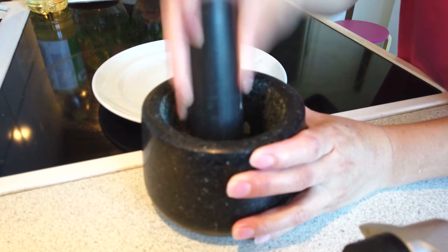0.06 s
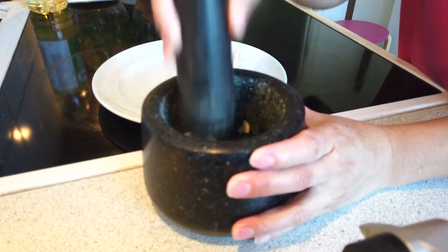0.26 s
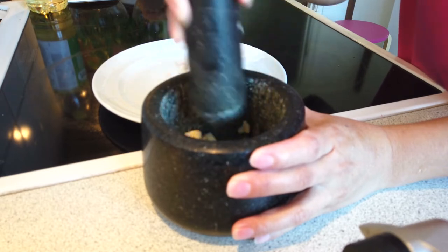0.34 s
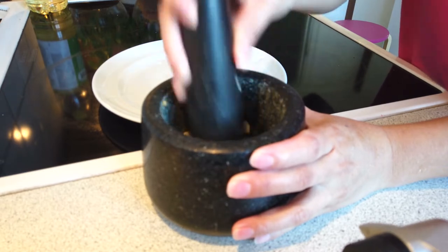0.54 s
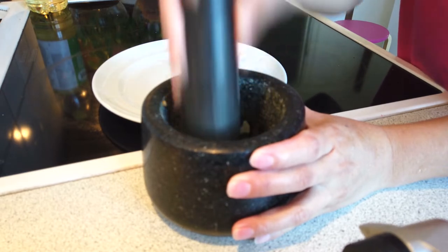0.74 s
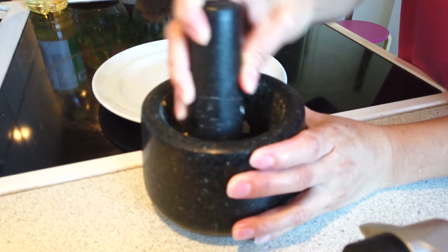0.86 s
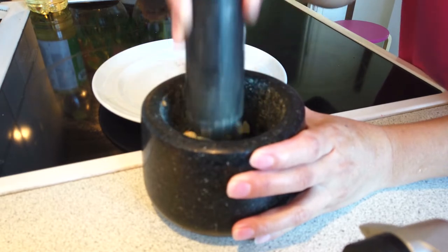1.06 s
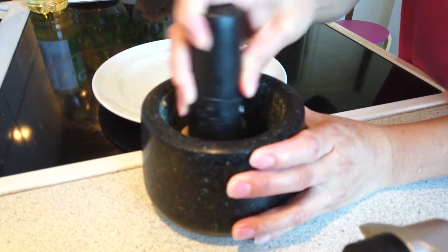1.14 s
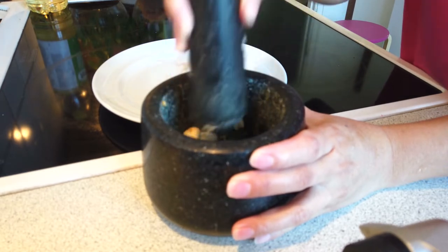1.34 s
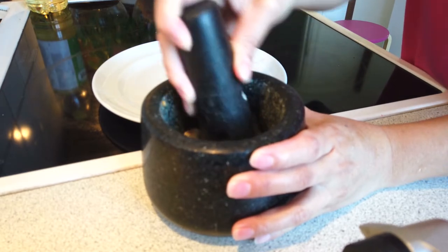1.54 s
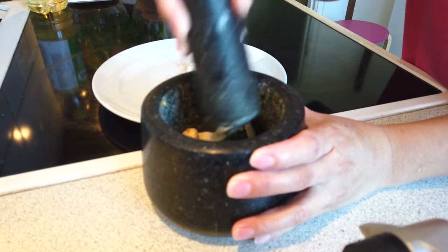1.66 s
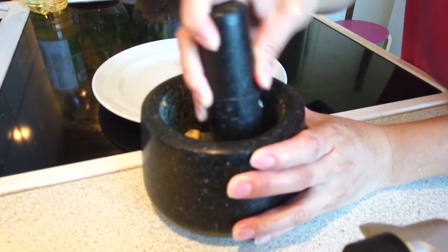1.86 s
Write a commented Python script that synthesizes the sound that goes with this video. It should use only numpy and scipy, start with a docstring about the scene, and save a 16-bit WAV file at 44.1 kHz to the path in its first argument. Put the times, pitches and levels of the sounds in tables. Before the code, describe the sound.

Granite mortar and pestle knocking and crunching on a kitchen counter, one blow far loudest

```python
"""Pestle and mortar in a kitchen

A granite pestle pounds food in a granite mortar on a counter, about three blows a second.
Cushioned blows break the food in noise bursts and bend the counter's modes; blows that reach
the stone excite the decaying modes of mortar and pestle. Near the end comes a faint short noise
burst with a few high ringing lines. A tiled kitchen answers as decaying diffuse noise over a
low rumble, and a close pair of microphones overloads on the hardest blow."""
import sys
import numpy as np
from scipy import signal
from scipy.fft import rfft, irfft
from scipy.io import wavfile
from scipy.ndimage import map_coordinates

SR = 44100
rng = np.random.default_rng(int(sys.argv[2]) if len(sys.argv) > 2 else 0)


def wrap_up_sound(samples):
    """Save the sound to the file named by the first command line argument, as 16-bit audio."""
    columns = np.atleast_2d(samples).T
    # keep every value between -1 and 1, then stretch to whole-number steps
    tamed = np.clip(columns, -1, 1)
    steps = np.round(tamed * 32767).astype(np.int16)
    wavfile.write(sys.argv[1], SR, steps)


N = 83790

# blows that reach the stone: (time [s], mortar knock level [dB], pestle ring level [dB], tick level [dB])
STONE_BLOWS = [(-0.1, -14.5, -28, -24.5), (0.2428, 9, -7.5, -16.5), (0.5800, -49, -32.5, -27.5),
               (0.938, -13, -12, -12), (1.2877, -32, -34.5, -27.5), (1.6037, -38, -31, -25.5)]


def undb(db):
    """Level as the logarithm of amplitude: decibels to gain."""
    return 10 ** (np.asarray(db) / 20)


def unit(x):
    """Energy normalization: scale to the energy of one millisecond at full level."""
    energy = SR * 0.001
    return x * np.sqrt(energy / np.sum(x ** 2))


def ring(modes):
    """Modal superposition: half a second of decaying sines, neighbours in opposite phase."""
    t = np.arange(SR // 2) / SR
    total = 0
    for k, (hz, db, t60) in enumerate(modes):
        decay = np.exp(-np.log(1000) * t / t60)
        mode = unit(np.sin(2 * np.pi * hz * t) * decay)
        total = total + (-1) ** k * undb(db) * mode  # each level weights the mode's energy
    return unit(total)


def colour(points, size):
    """Spectral envelope: gain at each FFT bin, interpolated over log frequency."""
    hz, db = np.array(points).T
    bins_hz = np.fft.rfftfreq(size, 1 / SR)
    return undb(np.interp(np.log(bins_hz + 1), np.log(hz), db))


def click(points):
    """Minimum phase: folding the cepstrum gives a causal impulse of the given colour."""
    size = SR // 2
    cepstrum = irfft(np.log(colour(points, size)), size)
    cepstrum[1:size // 2] *= 2
    cepstrum[size // 2 + 1:] = 0
    return unit(irfft(np.exp(rfft(cepstrum)), size))


def add(track, at_s, sound):
    """Linear superposition: mix a sound into a track that begins one second early."""
    start = int((at_s + 1) * SR)
    part = sound[:len(track) - start]
    track[start:start + len(part)] += part


def diffuse(size):
    """Diffuse-field coherence: noise spectra at two microphones, alike in bass, unrelated in treble."""
    spacing_m, sound_speed, bass_likeness = 0.031, 343, 0.975  # speed in m/s
    f = np.fft.rfftfreq(size, 1 / SR)
    like = np.sinc(2 * f * spacing_m / sound_speed) * bass_likeness
    mid, side = rfft(rng.standard_normal((2, size)))
    opposite = np.array([[1], [-1]])
    return mid * np.sqrt((1 + like) / 2) + side * np.sqrt((1 - like) / 2) * opposite


def push(length_s):
    """Elastic contact: a soft push is half a sine of force."""
    t = np.arange(SR // 20) / SR
    return np.sin(np.pi * np.minimum(t / length_s, 1))


def rub(length_s, body):
    """Broadband excitation: a short rough force, whitened across all pitches, drives a ringing body."""
    force = push(length_s)
    lead = len(force) // 10
    rough = force * rng.standard_normal(len(force))
    spectrum = rfft(np.roll(rough, lead))
    # whitening smears the force both ways in time; the part ahead of its start is cut off
    grit = irfft(spectrum / np.abs(spectrum), len(force))[lead:]
    return unit(signal.fftconvolve(grit, body))


def background():
    """Stationary diffuse noise: the low steady rumble of the room."""
    # rumble colour: (frequency [Hz], relative level [dB])
    rumble_colour = [(20, -4), (60, 6), (130, -3), (200, -6), (270, -15.5), (420, -25), (1000, -33),
                     (2500, -36), (6000, -47.5), (11000, -43.5), (16000, -62.5)]
    rumble_db = -54
    x = irfft(diffuse(N) * colour(rumble_colour, N), N)
    return undb(rumble_db) * x / x.std()


def stone():
    """Impact excitation: stone on stone gives a gritty tick and a knock of mortar modes and snap."""
    # mortar modes: (frequency [Hz], relative level [dB], t60 [s])
    mortar_modes = [(280, -18.5, .1), (412.4, -6.5, 0.1), (562, -15, 0.24), (593, -0.5, 0.19),
                    (646, 2, 0.012), (727.5, -13, 0.45), (878, -10, 0.45), (870, -6.5, .05),
                    (1028.6, -5.5, .06), (1123, -10, 0.4), (1239, -11, .07), (1414, -3.5, .08),
                    (1907, -21.5, .1)]
    # colour of the knock's snap: (frequency [Hz], relative level [dB])
    snap_colour = [(40, -4.5), (250, -22.5), (600, -3.5), (1200, -8), (1700, -13.5), (2700, -16),
                   (4200, -31), (8000, -37.5), (16000, -48)]
    # colour of the scraping tips: (frequency [Hz], relative level [dB])
    tick_colour = [(200, 12.5), (1500, 2), (2800, 6), (4200, 4), (6500, 6), (10500, 14.5), (12500, 5),
                   (16000, -19)]
    body_db, snap_db = -11.5, -3
    tick_s = 0.0014  # the rough tips scrape for a moment as they meet
    out, tick = np.zeros(N + SR), click(tick_colour)
    knock = undb(body_db) * ring(mortar_modes) + undb(snap_db) * click(snap_colour)
    for s, knock_db, _, tick_db in STONE_BLOWS:
        add(out, s, -undb(knock_db) * knock)
        add(out, s, undb(tick_db) * rub(tick_s, tick))
    return out


def pestle():
    """Damped free vibration: the pestle clinks at each crack, quickly damped by the hand."""
    # pestle modes: (frequency [Hz], relative level [dB])
    pestle_modes = [(985, -1), (1070, -6.5), (2090, 0), (2210, 2.5), (2430, -4), (2690, -5.5),
                    (3100, -11.5), (3650, -16)]
    fade_cycles = 70  # cycles to fade by 60 dB, the same for every mode
    out = np.zeros(N + SR)
    clink = ring([(hz, db, fade_cycles / hz) for hz, db in pestle_modes])
    for s, _, ring_db, _ in STONE_BLOWS:
        add(out, s, -undb(ring_db) * clink)
    return out


def counter():
    """Forced modal response: pushes bend the counter; the mortar rocks and chatters back onto it."""
    # the weight of each blow arriving in the counter: (time [s], level [dB], length of push [s])
    thumps = [(-0.09, -2.5, 0.0046), (0.2447, -2, 0.0029), (0.583, -15, 0.0031), (0.9401, -13, 0.0021),
              (1.292, -9.5, 0.0026), (1.6062, -11.5, 0.0032)]
    # the mortar landing: (time [s], counter level [dB], chatter level [dB], chatter length [s])
    settles = [(0.261, -14.5, -6, 0.008), (0.595, -20.5, -27.5, 0.022), (0.606, -54, -24, 0.0068),
               (0.9500, -5.5, -16, 0.0043), (1.303, -25, -33.5, 0.0071), (1.616, -11.5, -18, 0.032),
               (1.6280, -21.5, -19, .012)]
    # counter modes: (frequency [Hz], relative level [dB], t60 [s])
    counter_modes = [(62.3, -11.5, 0.27), (105.6, -3, 0.15), (154, -1, 0.27), (186, -9, 0.15),
                     (265.7, 6.5, 0.1), (343.2, -15, 0.49), (421, -7, 0.067)]
    # modes of the chattering mortar base: (frequency [Hz], relative level [dB], t60 [s])
    base_modes = [(280, 7, .08), (430, -5, 0.089), (572, 0, .1), (630, -4.5, .1), (823, -2.5, 0.074),
                  (1050, -7.5, .04), (1380, -9, 0.01)]
    out, top, base = np.zeros(N + SR), ring(counter_modes), ring(base_modes)
    for s, db, length in thumps:
        add(out, s, undb(db) * unit(signal.fftconvolve(push(length), top)))
    for s, counter_db, chatter_db, length in settles:
        add(out, s, undb(counter_db) * top)
        add(out, s, undb(chatter_db) * rub(length, base))
    return out


def kitchen(x):
    """Statistical reverberation: noise bands with a shared early decay and each its own late decay."""
    # kitchen bands: (centre frequency [Hz], late t60 [s], late level [dB], early level [dB])
    room_bands = [(59.6, 1, -14, -27), (150, 0.36, -1.5, -16.5), (332, 0.52, -9, -5.5),
                  (550, 0.51, -12, -6), (750, .45, -12.5, -6.5), (1080, 0.57, -9, -5), (1450, 0.48, -4, -9),
                  (2440, 0.51, -9, -6.5), (4530, 0.41, -3, -7), (9800, 0.16, -7.5, -5),
                  (12500, 0.13, -7.5, -5.5), (16000, .26, -10.5, -8)]
    early_t60_s, gap_s, rise_s = 0.28, 0.0045, 0.0038
    t, f = np.arange(SR) / SR, np.fft.rfftfreq(SR, 1 / SR)
    noise, centres = diffuse(SR), np.log([row[0] for row in room_bands])
    swell = np.clip((t - gap_s) / rise_s, 0, 1)
    early = swell * np.exp(-np.log(1000) * t / early_t60_s)
    early = early / np.linalg.norm(early)
    response = 0
    for share, (_, t60, late_db, early_db) in zip(np.eye(len(room_bands)), room_bands):
        late = swell * np.exp(-np.log(1000) * t / t60)
        late = late / np.linalg.norm(late)
        fade = np.hypot(undb(late_db) * late, undb(early_db) * early)
        band = np.interp(np.log(f + 1), centres, share)  # crossfades into its neighbours
        response = response + fade * irfft(noise * band, SR)
    return signal.fftconvolve(x[None], response, axes=1)[:, :len(x)]


def food():
    """Fracture noise: food breaks in a burst of tiny cracks that ring the hollow round the pestle."""
    # food giving way: (time [s], length [s], level [dB], skirt level relative to the burst [dB],
    # frequency of the hollow around the pestle [Hz], level of the hollow [dB])
    crunches = [(0.2421, 0.0026, -7, -11.5, 1940, -14), (0.5804, 0.0043, -13.5, -6.5, 2347, -25),
                (0.938, 0.0025, -11, -11, 2312, -25), (1.2822, 0.014, -15, -12.5, 3860, -37),
                (1.6034, 0.0078, -10, -13.5, 3376, -26)]
    # colour of one crack: (frequency [Hz], relative level [dB])
    crack_colour = [(200, 9), (1600, -10), (2300, -1), (3400, 4), (5800, -1), (8000, -1), (10300, 4.5),
                    (12500, -6), (16000, 4.5)]
    rise_share, roughness = 0.25, 0.82  # rise as a share of the length; log spread of crack sizes
    skirt_s, hollow_t60_s, lead_s = 0.0068, 0.015, 0.03
    out, grain = np.zeros(N + SR), click(crack_colour)
    t = np.arange(SR // 10) / SR - lead_s
    for s, length, db, skirt_db, hollow_hz, hollow_db in crunches:
        burst = np.clip(t / (rise_share * length), 0, 1) * np.exp(-(t / length) ** 2)
        skirt = undb(skirt_db) * np.exp(-abs(t) / skirt_s)  # soft noise on both sides of the burst
        sizes = np.exp(roughness * rng.standard_normal(len(t)))
        cracks = rng.standard_normal(len(t)) * sizes
        crunch = unit(signal.fftconvolve(cracks * (burst + skirt), grain))
        hollow = ring([(hollow_hz, 0, hollow_t60_s)])
        add(out, s - lead_s, undb(db) * crunch)
        add(out, s - lead_s, undb(hollow_db) * unit(signal.fftconvolve(cracks * burst, hollow)))
    return out


def faint_ringing():
    """Resonance under broadband excitation: a faint short noise burst with a few high ringing lines."""
    # ringing lines: (frequency [Hz], relative level [dB], t60 [s])
    line_modes = [(2604, 0.5, 0.11), (3010, -8.5, 0.21), (3820, -14.5, 0.061), (5580, 2.5, 0.58),
                  (10955, -22.5, 0.087)]
    at_s, length_s, level_db = 1.884, 0.0094, -36
    out = np.zeros(N + SR)
    add(out, at_s, undb(level_db) * rub(length_s, ring(line_modes)))
    return out


def scene():
    """Direct and reverberant fields: near sound, a little earlier on the right, plus the kitchen."""
    lag_s = 0.00002
    hard_wet_db, pestle_wet_db, food_wet_db, counter_wet_db = 2, 1.5, -8, -7
    hard, clink, soft, low = stone() + faint_ringing(), pestle(), food(), counter()
    near, i = hard + clink + soft + low, np.arange(N + SR)
    left = map_coordinates(near, [i - lag_s * SR])
    direct = np.array([left, near])
    into_room = undb(hard_wet_db) * hard + undb(pestle_wet_db) * clink
    into_room = into_room + undb(food_wet_db) * soft + undb(counter_wet_db) * low
    heard = (direct + kitchen(into_room))[:, SR:]  # drop the second ahead of time zero
    return heard + background()


def record(dry):
    """Band limits and saturation: the recorder thins deep bass, flattens high peaks, cuts the top."""
    low_cut_hz, top_hz = 19, 15750
    bass_cut = signal.butter(1, low_cut_hz, "highpass", fs=SR, output="sos")
    top_cut = signal.ellip(10, 0.2, 90, top_hz, fs=SR, output="sos")  # ripple and stopband in dB
    thin = signal.sosfilt(bass_cut, dry)
    clipped = 0.96 * thin / (1 + thin ** 8) ** (1 / 8)  # nearly linear up to a sharp knee
    return signal.sosfilt(top_cut, clipped)


dry = scene()
out = record(dry)
wrap_up_sound(out)
```